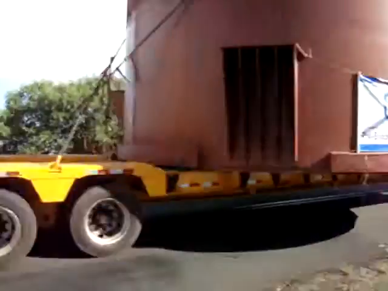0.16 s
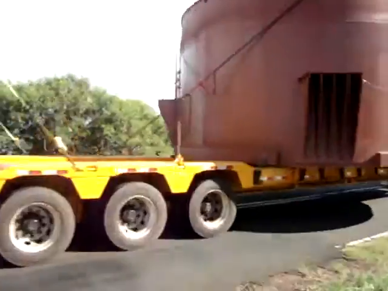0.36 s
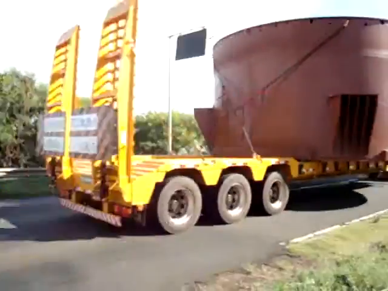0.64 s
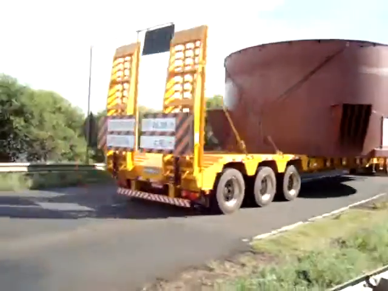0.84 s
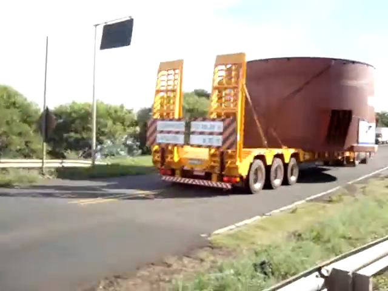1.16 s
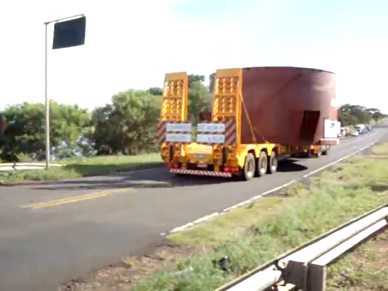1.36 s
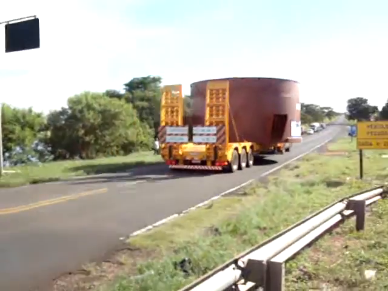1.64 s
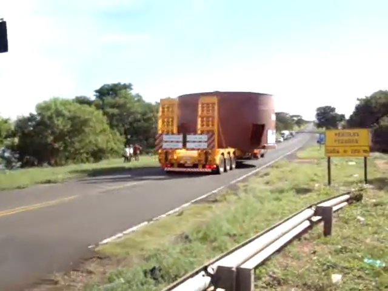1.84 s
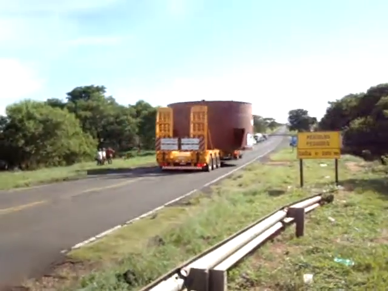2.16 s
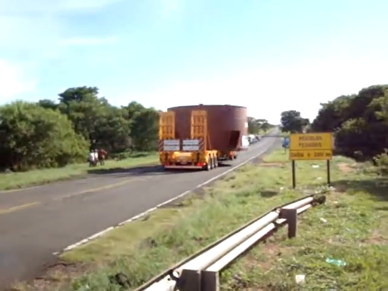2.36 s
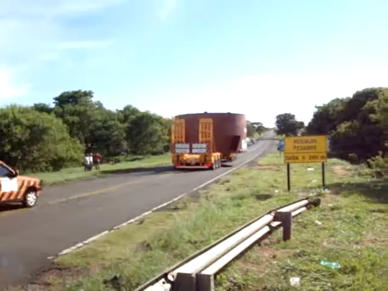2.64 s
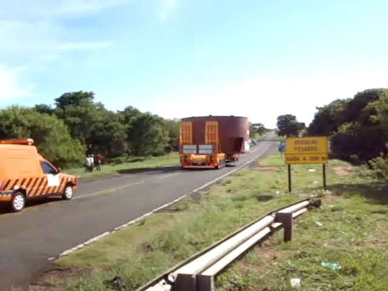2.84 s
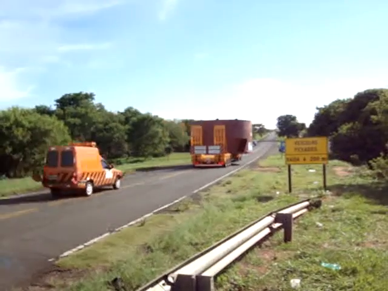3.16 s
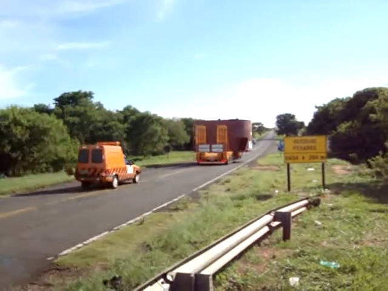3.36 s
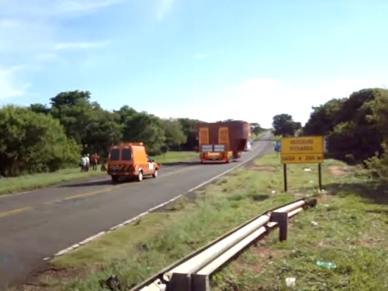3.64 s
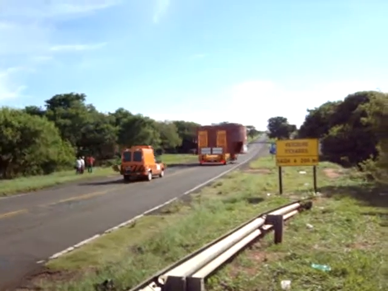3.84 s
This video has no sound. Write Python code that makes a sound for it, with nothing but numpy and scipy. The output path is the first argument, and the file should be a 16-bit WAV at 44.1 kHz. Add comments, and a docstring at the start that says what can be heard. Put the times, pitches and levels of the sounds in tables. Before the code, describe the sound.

A heavy low-bed trailer passes close on an open country road, its tyre roar strongest around 0.4 s over a dull engine drone. Until about 0.9 s joints squeak, ramps and chains clatter, and the deck booms over bumps. Sparser rattles follow as it fades. Around 2.5 s wind thumps the microphone; a van's lighter tyre noise swells near 2.6-2.9 s, then recedes over distant rumble and faint steady hiss until 4 s.

```python
"""A heavy low-bed trailer rolls past on a country road and draws away; a small van follows.
From the start tyres roar (noise bands) over an engine drone (resonances) and a faint steady hiss.
Joints squeak (wavering tones), ramps and chains clatter (contacts ringing short steel modes), and
the deck booms over bumps (jolts ringing its modes). After 2 s the van's tyres swell past (noise),
low gusts buffet the microphone and wind thumps it (short low swings)."""
import sys
import numpy as np
from scipy import signal
from scipy.io import wavfile

SR = 44100
rng = np.random.default_rng(int(sys.argv[2]) if len(sys.argv) > 2 else 0)


def output_pcm(signal):
    """Save a mono or channel-first signal as 16-bit PCM at the path in sys.argv[1].

    Samples are clipped to [-1, 1] before scaling.
    """
    pcm = np.clip(np.atleast_2d(signal).T, -1, 1) * 32767
    wavfile.write(sys.argv[1], SR, np.round(pcm).astype(np.int16))


def nominal_scale(level):
    """Amplitude ratio for a level in decibels (scalar or array-like)."""
    x = np.asarray(level, float) / 20
    return 10 ** x


N = 176400


def rms_one(x):
    """Scale to rms 1."""
    return x / np.sqrt(np.mean(x ** 2) + 1e-20)


def butter(x, order, hz, kind):
    """Butterworth filter: low, high or band."""
    return signal.sosfilt(signal.butter(order, hz, kind, fs=SR, output="sos"), x)


def in_time(rows):
    """Table columns as straight lines in time."""
    s, *columns = np.transpose(rows)
    return [np.interp(np.arange(N) / SR, s, column) for column in columns]


def at_hz(points, hz):
    """Spectrum table read on a log frequency axis."""
    table_hz, table_db = np.transpose(points)
    return np.interp(np.log(hz), np.log(table_hz), table_db)


def drift(rate_hz):
    """Slow random wander, rms 1: low-passed noise made at SR / 40."""
    r = np.exp(-80 * np.pi * rate_hz / SR)
    slow = signal.lfilter([1], [1, -2 * r, r * r], rng.standard_normal(N // 40 + 2002))
    slow = rms_one(slow[2000:])  # settled part
    return np.interp(np.arange(N) / 40, np.arange(len(slow)), slow)


def ring(x, hz, t60_s):
    """One damped mode, scaled so that noise keeps its power."""
    r = nominal_scale(-60 / (t60_s * SR))
    w = 2 * np.pi * hz / SR
    gain = np.sin(w) * np.sqrt(4 * (1 - r))
    return signal.lfilter([0, gain], [1, -2 * r * np.cos(w), r * r], x + 1e-18)


def burst(start_s, length_s, rise_s, fall_s):
    """Envelope: linear rise, hold, exponential fall."""
    t = np.arange(N) / SR - start_s
    return np.clip(t / rise_s, 0, 1) * np.exp(-np.maximum(t - length_s, 0) / fall_s)


CLICKS_PER_S, CLICK_SPREAD_DB = 6000, 3.5


def clicks():
    """Dense uneven contacts of either sign, rms 1."""
    sizes = nominal_scale(CLICK_SPREAD_DB * np.minimum(rng.exponential(1, N), 4))
    sizes = sizes * rng.choice([-1, 1], N)
    return rms_one(sizes * (rng.random(N) < CLICKS_PER_S / SR))


GRIT = 0.1  # click rms re noise rms


def tread_noise(spectrum, patchy_db, tilt_db, bass_db):
    """Third-octave noise bands with road grit, each flickering; tilt and bass are dB per octave."""
    edges = 22 * 2 ** np.arange(0, 9.1, 1 / 3)
    together = drift(4.0)
    white = rng.standard_normal((2, N)) + GRIT * clicks()
    out, flat_power = 0, 0
    for k, (low, high) in enumerate(zip(edges, edges[1:])):
        hz = np.sqrt(low * high)
        band = nominal_scale(at_hz(spectrum, hz)) * butter(white[k % 2], 2, [low, high], "band")
        flat_power += np.mean(band ** 2)
        flicker_db = patchy_db * (0.37 * together + drift(14.3))
        treble_db = tilt_db * max(np.log2(hz / 1000), 0)
        low_db = bass_db * np.clip(np.log2(400 / hz), 0, 2)
        out = out + band * nominal_scale(flicker_db + treble_db + low_db)
    return out / np.sqrt(flat_power)


# trailer rolling: (time [s], level before ROLL_TRIM_DB [dB], tilt above 1 kHz [dB/octave],
# tilt below 400 Hz, held past two octaves [dB/octave])
ROLL = [(0.0, -28.5, 2, -1.5), (0.17, -26, 1.5, -1.5), (0.38, -24, 1.5, -3), (0.69, -25.5, 0.5, 1.5),
        (0.98, -31.5, -0.5, -0.5), (1.31, -31, -0.5, -3), (1.57, -35, 0.5, 4), (2.82, -41, -0.5, 7),
        (3.4, -45, -0.5, 4), (4.0, -44, 0.0, 4)]
# trailer tyre spectrum: (frequency [Hz], relative density [dB per Hz])
TYRES = [(15, -75), (25, -57.5), (73, -24), (155, -13), (185, -5), (346, -4), (445, -8), (504, -1),
         (810, -1), (1120, -0.5), (1590, -8), (2210, -7.5), (9900, -34.5), (12900, -41), (21800, -120)]
# engine drone: (frequency [Hz], nominal width [Hz], level re tyre roar [dB])
DRONE = [(193.6, 30, -20.5), (495.4, 28, -14), (629, 25, -15.5)]
ROLL_TRIM_DB, ROLL_PATCHY_DB = 0.5, 1.5


def rolling():
    """Tyre roar and dull engine drone (resonant noise) fade with distance."""
    level_db, tilt_db, bass_db = in_time(ROLL)
    drone = 0
    for hz, width_hz, db in DRONE:
        swell = nominal_scale(db + 1.3 * drift(8.4))
        drone = drone + swell * rms_one(ring(rng.standard_normal(N), hz, 1.87 / width_hz))
    roar = tread_noise(TYRES, ROLL_PATCHY_DB, tilt_db, bass_db)
    return nominal_scale(level_db + ROLL_TRIM_DB) * (roar + drone)


HISS_DB = -58


def hiss():
    """Steady electronic white noise."""
    return nominal_scale(HISS_DB) * rng.standard_normal(N)


# joint squeaks: (time [s], length [s], frequency [Hz], level [dB], roughness [0-1, clipped at 1])
SQUEAKS = [(.004, 0.011, 2896, -24.5, 0), (.023, 0.016, 2830, -28, 0), (.06, 0.018, 2930, -33, 0.55),
           (.058, 0.037, 1994, -29, 0.4), (.058, .026, 4010, -34.5, 0.9), (.083, 0.022, 1924, -20.5, 0.54),
           (.114, 0.045, 1873, -26.5, 0.88), (.126, 0.016, 2710, -27, 0.6), (.15, 0.0177, 3730, -32, 0.9),
           (.28, .1, 2275, -30, 0), (.388, 0.038, 3740, -34, 0.8), (.43, 0.092, 4160, -31, 0.9),
           (.476, 0.048, 2460, -25.5, .7), (.55, .045, 2233, -24.5, 0.65), (.59, .075, 2576, -20, .7),
           (.59, .055, 7800, -39.5, 0.9), (.597, 0.069, 4085, -32, .9), (.625, 0.026, 2260, -22, 0.2),
           (.67, 0.11, 3027, -22.5, 0.9), (.74, 0.035, 3110, -27, 0.9), (.745, 0.073, 3535, -26.5, 0.6),
           (.8, 0.082, 3890, -33.5, 0.84), (.845, 0.053, 1950, -34, 0.2), (1.025, 0.045, 3690, -38, .7),
           (1.07, 0.038, 3990, -42, 1.1), (1.054, 0.019, 1934, -29.5, 0.54), (2.28, 0.067, 6450, -61, 0.6),
           (3.275, .045, 2200, -54, .7), (3.275, 0.05, 4300, -66, 0.6)]
SQUEAK_EDGE_S, SQUEAK_WAVER, SQUEAK_SECOND_DB, SQUEAK_GRAIN_HZ = 0.0074, 0.008, -20.5, 260


def squeaks():
    """Stick-slip tones that waver in pitch; rough slipping breaks them into grains."""
    waver = drift(58.0)
    grain = rms_one(butter(rng.standard_normal((2, N)), 2, SQUEAK_GRAIN_HZ, "low"))
    out = 0
    for k, (s, length_s, hz, db, rough) in enumerate(SQUEAKS):
        rough = np.clip(rough, 0, 1)
        pitch_hz = hz * (1 + SQUEAK_WAVER * np.roll(waver, 5003 * k))
        phase = 2 * np.pi * np.cumsum(pitch_hz) / SR
        in_phase, quadrature = np.roll(grain, 3001 * k, axis=1) * rough
        steady = np.sqrt(2 - 2 * rough ** 2)
        wave = np.sin(phase) + nominal_scale(SQUEAK_SECOND_DB) * np.sin(2 * phase)
        tone = (steady + in_phase) * wave + quadrature * np.cos(phase)
        out = out + nominal_scale(db) * burst(s, length_s, SQUEAK_EDGE_S, SQUEAK_EDGE_S) * tone
    return out


# ramp and chain rattles: (time [s], length [s], level [dB], brightness re 3 kHz [dB/octave],
# top frequency [Hz])
CLATTER = [(0.082, 0.078, -24.5, -3.5, 4500), (.125, 0.06, -29.5, -7, 4600), (0.191, 0.11, -24, -2.5, 8000),
           (0.324, 0.024, -31.5, 11, 8000), (0.356, 0.15, -28, -9.5, 4600), (0.473, 0.04, -34.5, 15, 7440),
           (0.535, 0.054, -29.5, 0.5, 4820), (0.594, 0.054, -19.5, 3.5, 9000),
           (0.671, 0.074, -23.5, -0.5, 4800), (0.734, 0.035, -18.5, 5, 8500),
           (0.792, 0.076, -35, -10.5, 4560), (0.888, 0.089, -35.5, -7.5, 4500),
           (1.102, .07, -37.5, -9, 5000), (1.286, 0.067, -29.5, -0.5, 6200),
           (1.387, 0.055, -36.5, -4.5, 4600), (1.807, 0.036, -41, 0, 7000), (2.226, 0.084, -45.5, -5, 5200),
           (2.564, 0.023, -37.5, -2.5, 7000), (2.608, 0.073, -44, -8.5, 4500)]
# steel mode spectrum: (frequency [Hz], relative density [dB per Hz])
STEEL = [(1100, -6), (1500, -3.5), (2000, 3), (2600, 2.5), (3300, 0.5), (4200, -1.5), (5200, -7.5),
         (6200, -13.5), (7500, -26), (10000, -52)]
CLATTER_RISE_S, CLATTER_FALL_S, STEEL_LOW_HZ = 0.0024, 0.028, 1134
STEEL_CYCLES, STEEL_WANDER_DB, TOP_FALL_DB_PER_OCTAVE = 26, 2, 21  # cycles per t60


def clatter():
    """Rattling contacts dealt to 28 short steel modes, each coming and going."""
    modes_hz = np.geomspace(1250, 10000, num=28) * rng.uniform(0.99, 1.03, 28)
    gains = nominal_scale(at_hz(STEEL, modes_hz)) * np.sqrt(modes_hz)
    gains = gains / np.sqrt(np.sum(gains ** 2))
    start_s, length_s, db, tilt, top_hz = np.transpose(CLATTER)
    shapes = np.array([burst(s, d, CLATTER_RISE_S, CLATTER_FALL_S) for s, d in zip(start_s, length_s)])
    hits, dealt, wander = clicks(), rng.integers(0, 4, N), drift(15.0)
    out = 0
    for k, hz in enumerate(modes_hz):
        top_fall_db = TOP_FALL_DB_PER_OCTAVE * np.maximum(np.log2(hz / top_hz), 0)
        push = nominal_scale(db + tilt * np.log2(hz / 3000) - top_fall_db) @ shapes
        push = push * nominal_scale(STEEL_WANDER_DB * np.roll(wander, 6007 * k))
        mode = ring(hits * (dealt == k % 4) * push, hz, STEEL_CYCLES / hz)
        # 2 restores the power of a quarter of the contacts
        out = out + 2 * gains[k] * butter(mode, 1, [hz / 1.45, hz * 1.54], "band")
    return butter(out, 4, STEEL_LOW_HZ, "high")


# deck jolts: (time [s], length [s], level [dB], brightness re 750 Hz [dB/octave])
BOOMS = [(0.238, 0.065, -21.5, -12.5), (0.346, 0.057, -44, 4), (0.413, 0.014, -48, -6),
         (0.454, 0.071, -23.5, -10), (0.591, 0.08, -26, 6.5), (0.689, 0.036, -23.5, -1),
         (0.728, 0.043, -21.5, 5), (0.793, 0.088, -30, 1), (0.894, 0.082, -31.5, 7.5),
         (1.124, 0.031, -34, 0), (1.269, 0.068, -33, 4), (1.398, 0.066, -36.5, -4), (2.237, 0.047, -45, 9),
         (3.668, 0.026, -47.5, 10)]
# deck modes: (frequency [Hz], relative level [dB], t60 [s])
DECK = [(330, -21, .05), (492, -9.5, 0.066), (607, -1, 0.08), (638, 0.5, 0.071), (727, 5.5, .1),
        (864, 7.5, 0.044), (986, 3, 0.08), (1100, 4, 0.054), (1237, -6, 0.095)]
BOOM_RISE_S, BOOM_FALL_S = 0.011, 0.03


def deck():
    """Runs of jolts over bumps shake the deck's modes, each with a strength that wanders."""
    start_s, length_s, db, tilt = np.transpose(BOOMS)
    shapes = np.array([burst(s, d, BOOM_RISE_S, BOOM_FALL_S) for s, d in zip(start_s, length_s)])
    hits = clicks()
    total = np.sqrt(sum(nominal_scale(2 * mode_db) for _, mode_db, _ in DECK))
    out = 0
    for hz, mode_db, t60_s in DECK:
        push = nominal_scale(db + tilt * np.log2(hz / 750)) @ shapes
        out = out + nominal_scale(mode_db + 2.5 * drift(9.5)) * ring(hits * push, hz, t60_s) / total
    return butter(out, 3, (376, 1700), "band")


# van pass: (time [s], level [dB])
VAN = [(2.0, -58), (2.45, -59), (2.62, -43), (2.85, -44.5), (3.05, -47), (3.25, -52.5), (3.4, -54),
       (4.0, -52)]
# van tyre spectrum: (frequency [Hz], relative density [dB per Hz])
VAN_TYRES = [(300, -13), (600, -18.5), (1000, 1.5), (1350, 3), (1600, -6), (2500, -13.5), (4000, -17),
             (9000, -30.5)]


def van():
    """Lighter tyre noise, strongest near 1 kHz, swells past."""
    level_db, = in_time(VAN)
    return nominal_scale(level_db) * tread_noise(VAN_TYRES, patchy_db=1.9, tilt_db=0, bass_db=0)


# gusts: (time [s], length [s], level [dB])
GUSTS = [(2.186, 0.035, -44), (2.505, 0.074, -44), (2.634, 0.057, -43.5), (3.477, 0.052, -46.5),
         (3.638, 0.029, -48.5), (3.93, 0.042, -48)]


def gusts():
    """Buffeting: bursts of lumpy low noise on the membrane."""
    lumps = rms_one(butter(rng.standard_normal(N), 2, (99, 344), "band"))
    return lumps * sum(nominal_scale(db) * burst(s, d, 0.024, 0.028) for s, d, db in GUSTS)


# wind thumps: (time [s], peak before the high-pass [dB], frequency [Hz])
THUMPS = [(2.451, -31, 302), (2.521, -28, 380), (2.534, -28, 251), (2.54, -25, 330), (2.56, -27.5, 218),
          (2.5642, -26, 330), (2.6, -22.5, 487), (2.668, -31.5, 216)]
THUMP_CYCLES = 1.2  # between 1/e points


def wind():
    """Each thump is a swing or two of the membrane under a Gaussian envelope."""
    out = 0
    for s, db, hz in THUMPS:
        t = np.arange(N) / SR - s
        envelope = np.exp(-4 * (t * hz / THUMP_CYCLES) ** 2)
        out = out + nominal_scale(db) * envelope * np.cos(2 * np.pi * hz * t)
    return butter(out, 2, 120.0, "high")


def scene():
    """One microphone, written to both channels."""
    trailer = rolling() + deck() + clatter() + squeaks()
    return np.tile(trailer + van() + wind() + gusts() + hiss(), (2, 1))


def low_pass(x):
    """Removes everything above the highest recorded frequency."""
    return signal.sosfilt(signal.butter(12, 10050, fs=SR, output="sos"), x)


MIC_LOW_HZ, CEILING, TOP_HZ = 70.0, 0.59, 10050


def record(dry):
    """The microphone drops the deep bass, peaks are rounded, the top is cut steeply."""
    x = butter(dry, 2, MIC_LOW_HZ, "high")
    x = CEILING * np.tanh(x / CEILING)
    x = signal.sosfilt(signal.ellip(12, 0.5, 75, TOP_HZ, fs=SR, output="sos"), x)
    return low_pass(x)


dry = scene()
out = record(dry)
output_pcm(out)
```